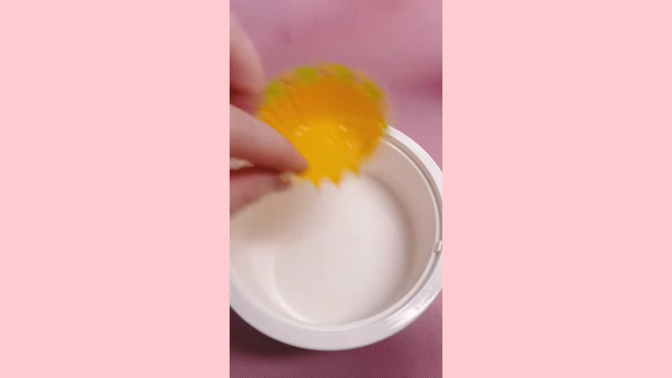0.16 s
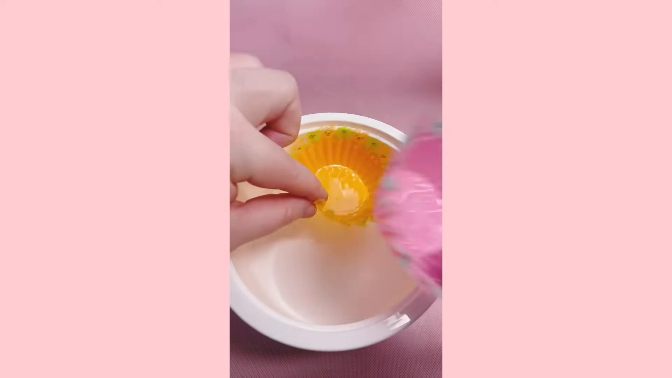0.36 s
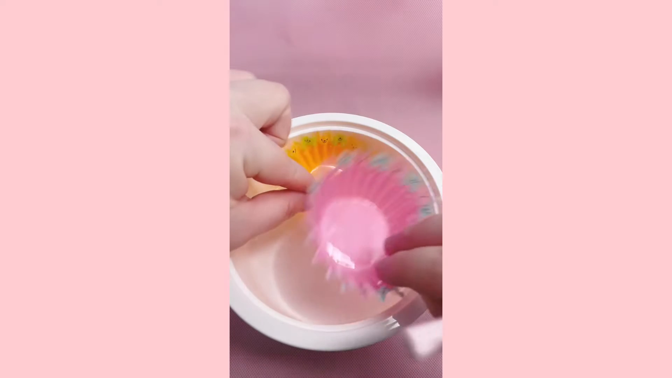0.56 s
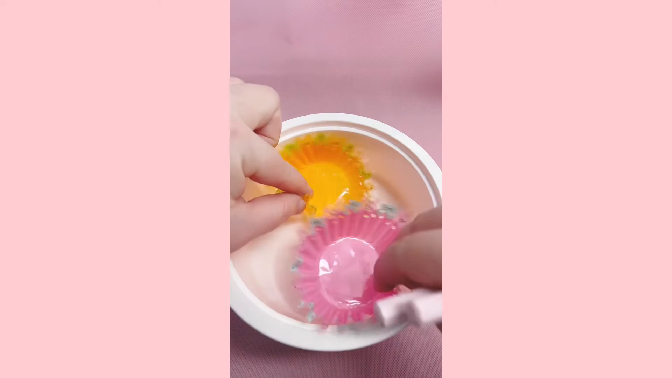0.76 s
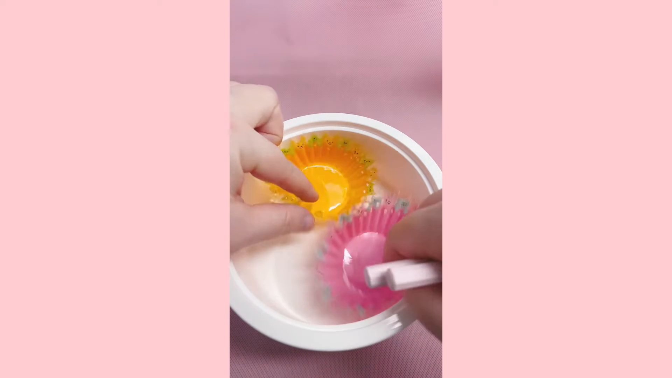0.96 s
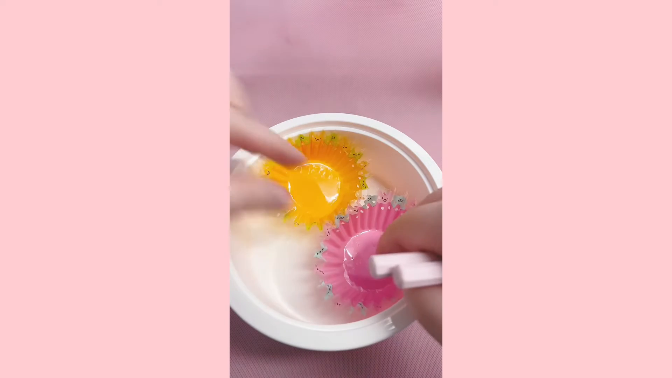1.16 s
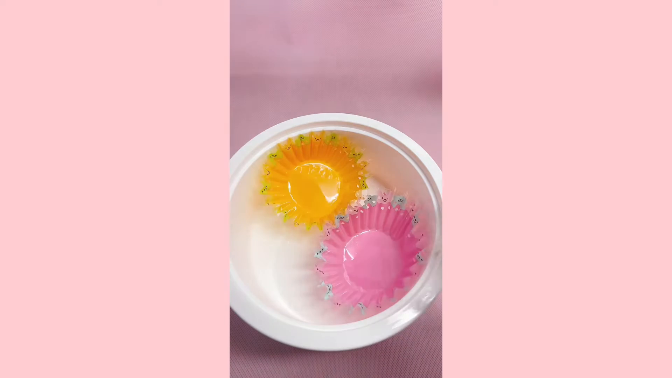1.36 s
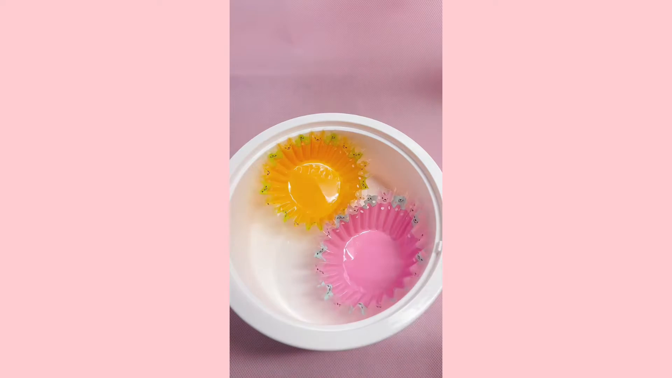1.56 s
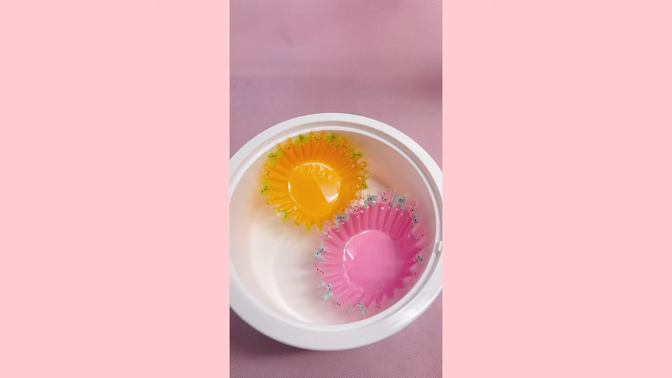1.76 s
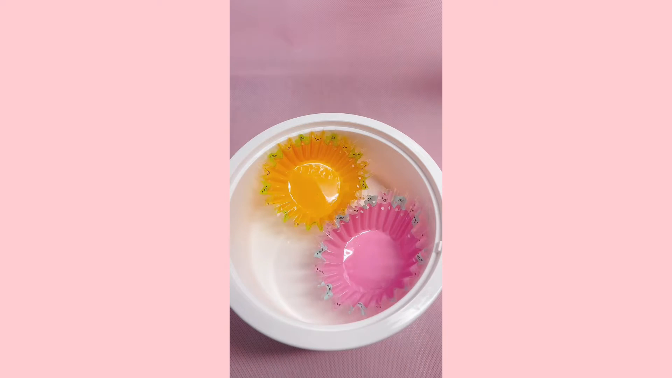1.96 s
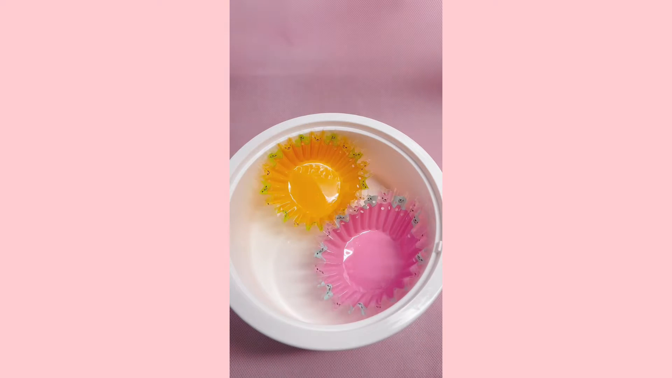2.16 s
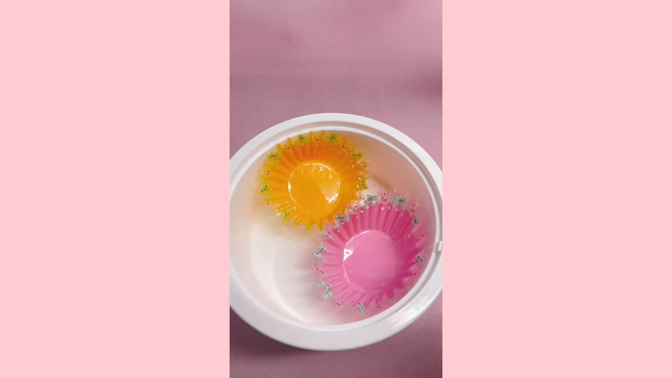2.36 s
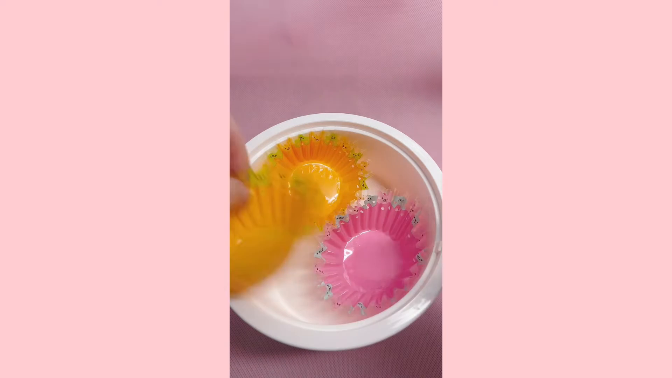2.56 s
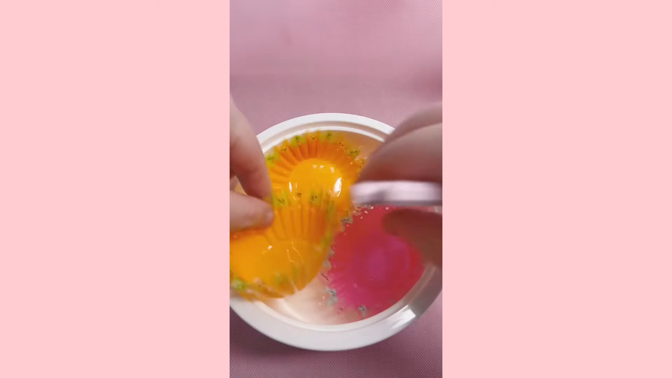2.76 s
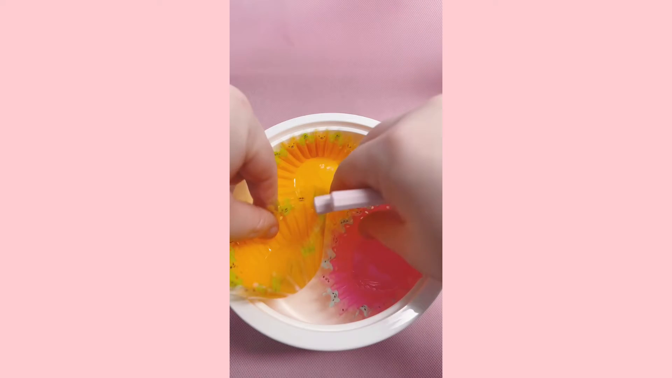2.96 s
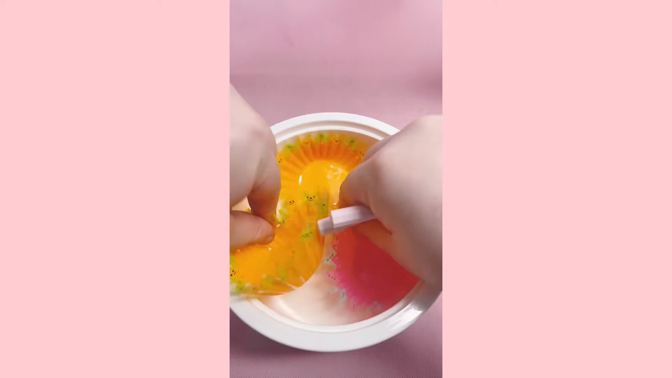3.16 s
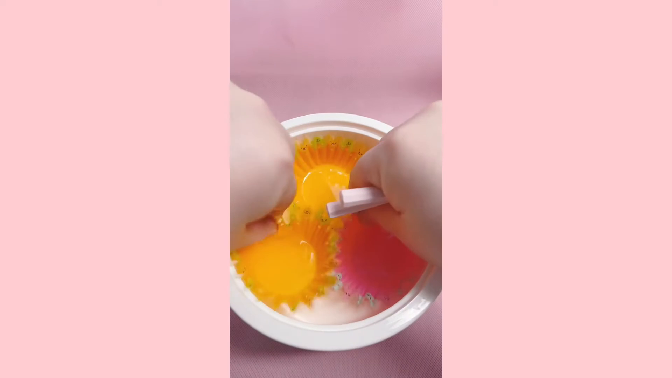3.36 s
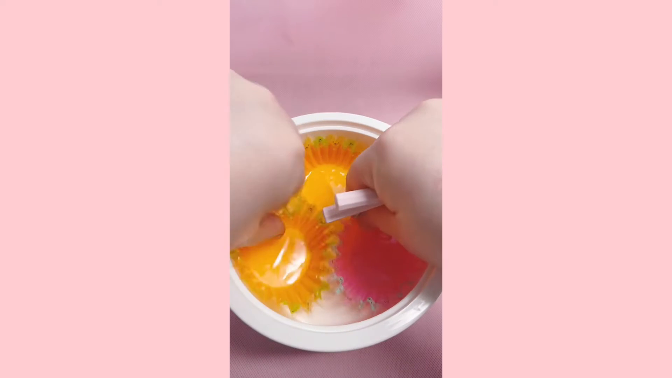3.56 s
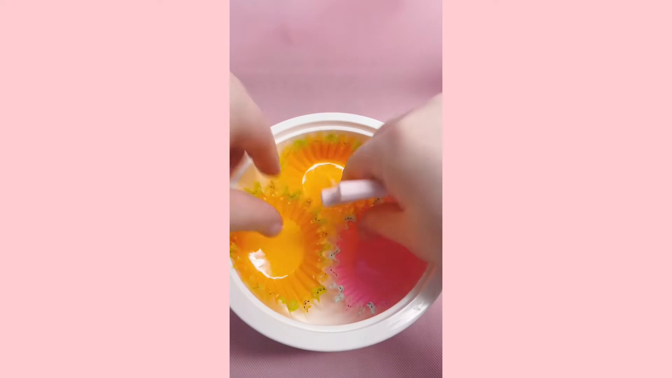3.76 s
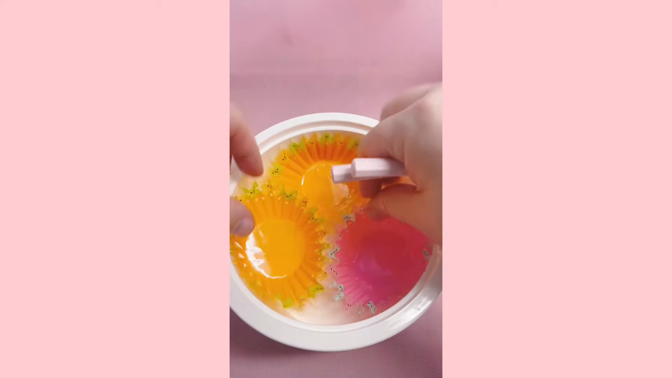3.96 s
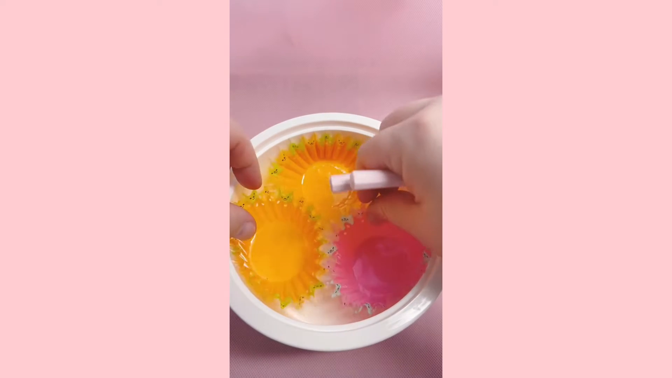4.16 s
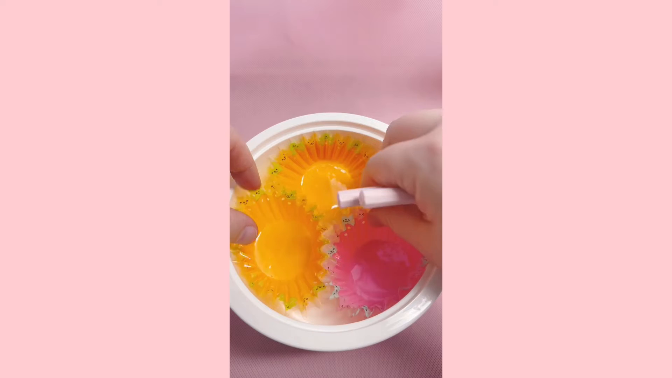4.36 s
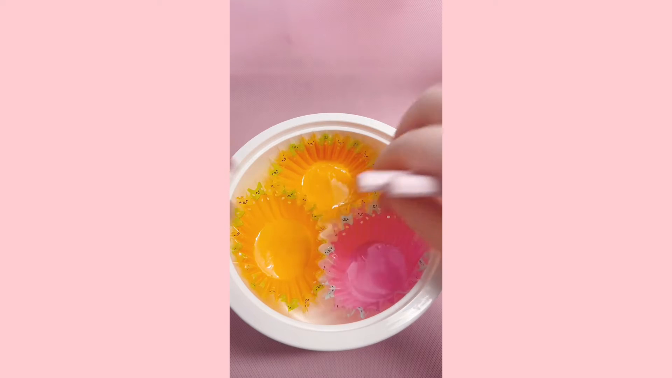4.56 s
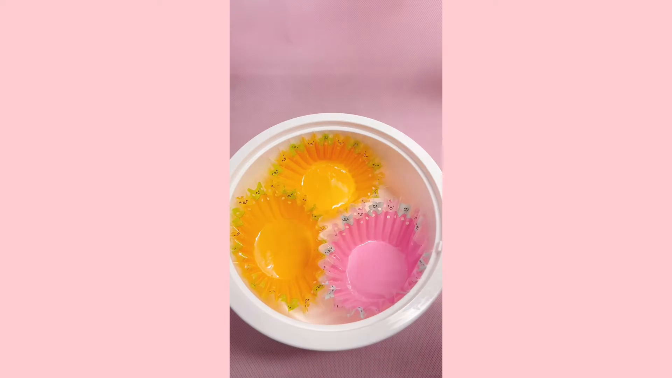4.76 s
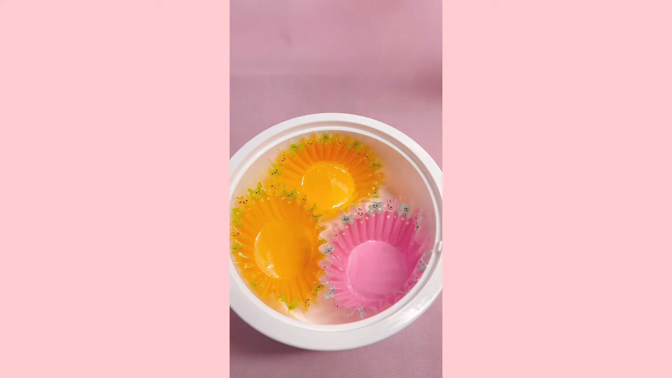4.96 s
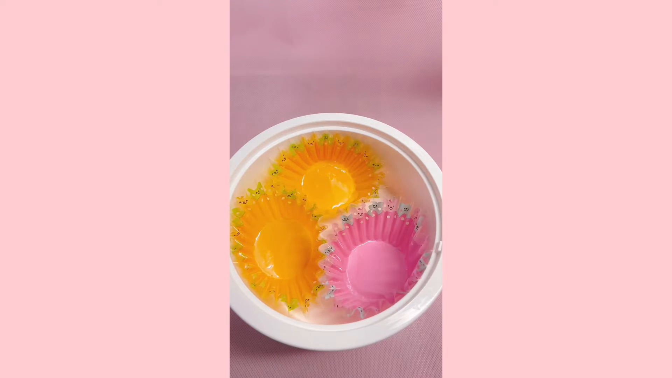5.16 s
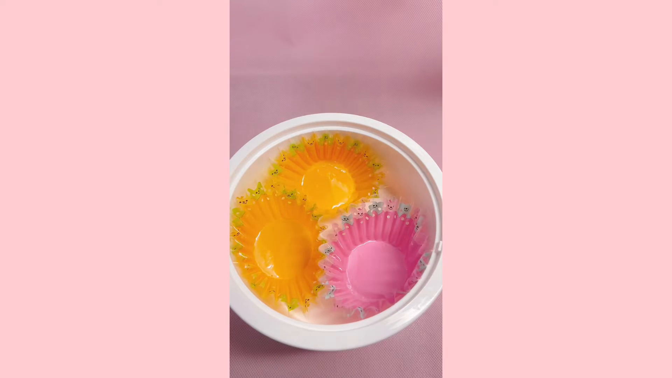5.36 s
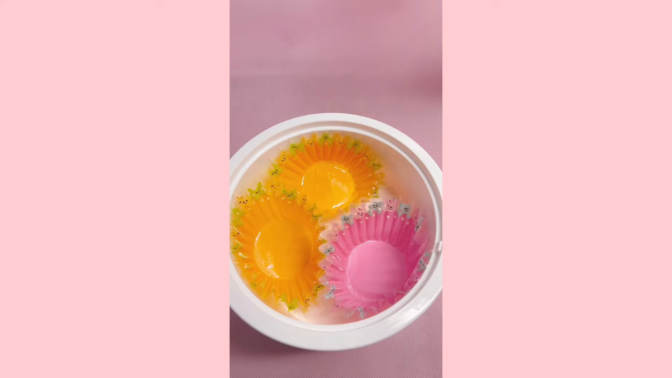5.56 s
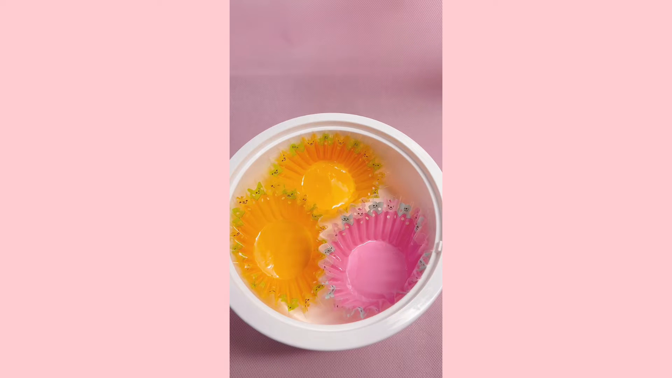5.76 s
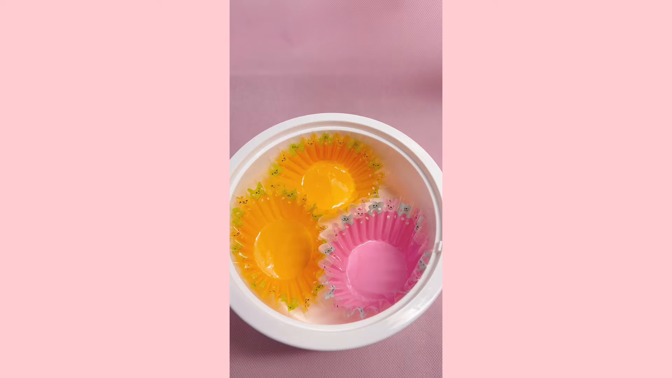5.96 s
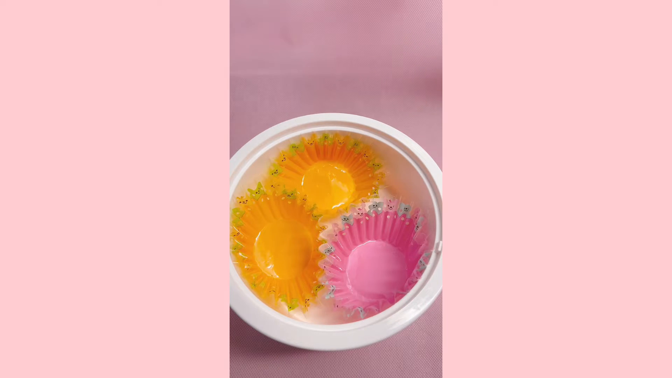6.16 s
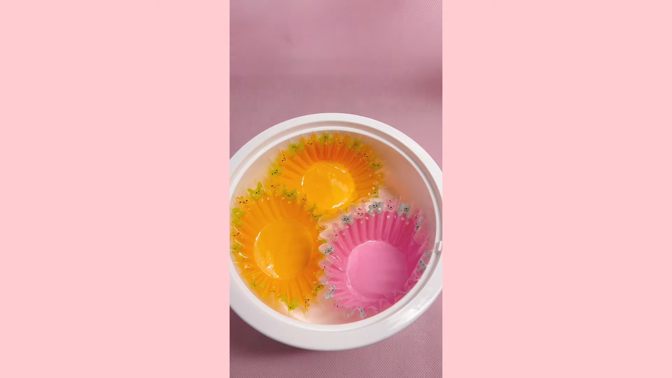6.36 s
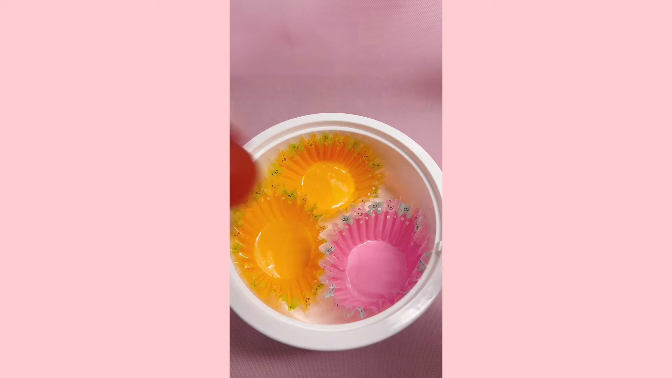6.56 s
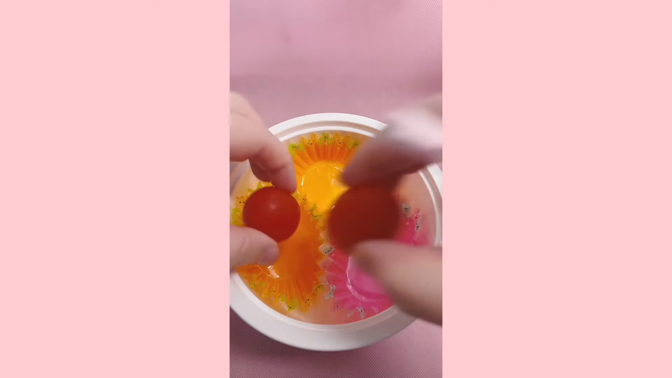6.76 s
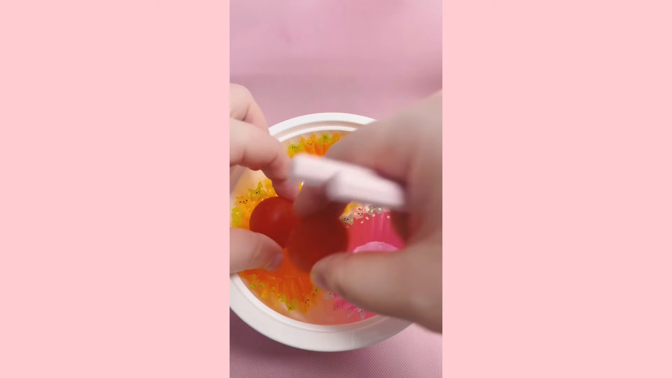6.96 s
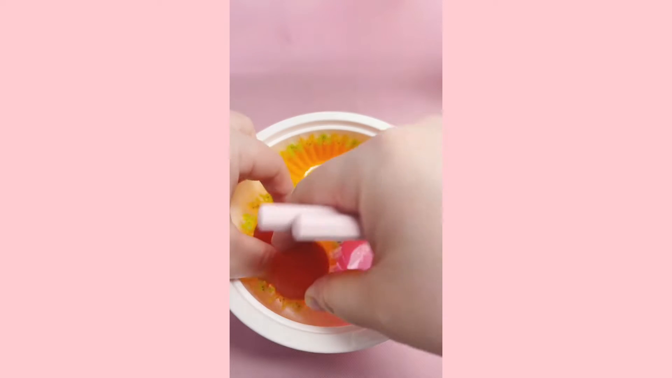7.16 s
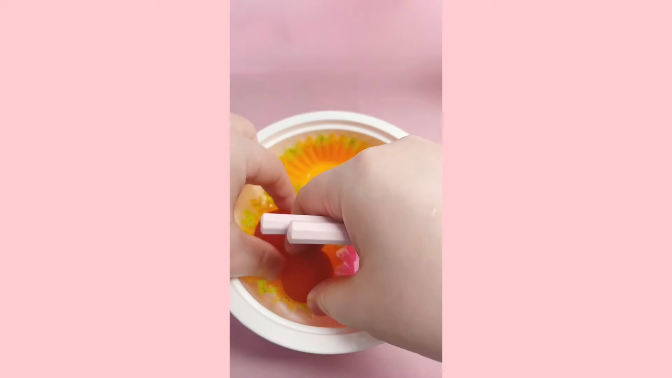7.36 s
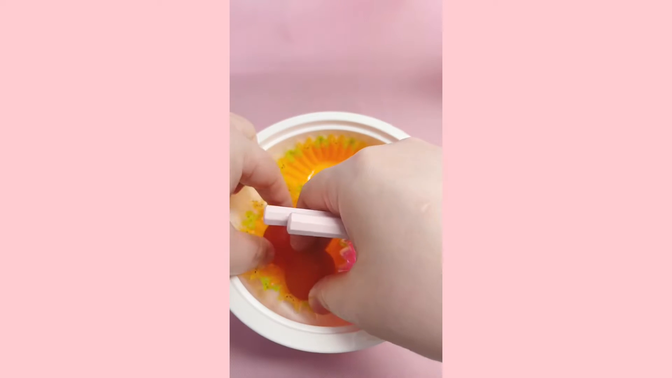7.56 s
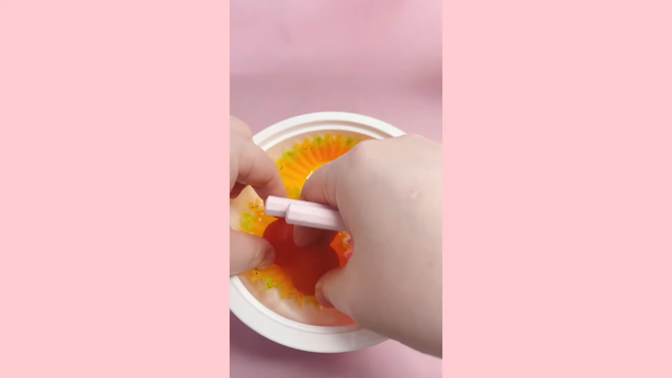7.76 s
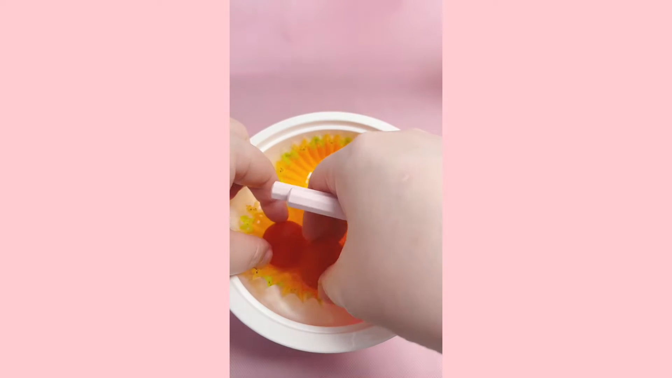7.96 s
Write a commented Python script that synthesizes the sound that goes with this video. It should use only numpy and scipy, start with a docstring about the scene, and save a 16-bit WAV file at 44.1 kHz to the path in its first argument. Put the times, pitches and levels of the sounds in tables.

```python
"""Paper cups, bowl and chopsticks

Pleated paper cups are pressed into a plastic bowl on a table, close to a phone. Snaps and clicks are
noise bursts exciting paper spectra and damped modes; the cups' hollows colour the snaps, and rustle is
filtered noise. Decaying modes make the knocks of bowl and table as a small fruit drops in.
A quiet room with an appliance hum answers briefly through decaying noise tails."""
import sys
import numpy as np
from scipy import signal
from scipy.fft import rfft, irfft, next_fast_len
from scipy.io import wavfile
from scipy.ndimage import map_coordinates

SR = 44100
rng = np.random.default_rng(int(sys.argv[2]) if len(sys.argv) > 2 else 0)


def file_out(sig):
    """Save sig as 16-bit WAV at sys.argv[1]."""
    # one column per channel
    cols = np.atleast_2d(sig).T
    # limit, then scale
    lim = np.clip(cols, -1, 1)
    pcm = np.round(lim * 32767).astype(np.int16)
    wavfile.write(sys.argv[1], SR, pcm)


N = 352359  # samples


def amp(db):
    """Logarithmic level: decibels to an amplitude ratio."""
    return 10 ** (np.asarray(db) / 20)


def unit(x):
    """Power normalization: scale a signal to rms 1."""
    return x / np.sqrt(np.mean(x ** 2) + 1e-20)


def along(points, hz):
    """Logarithmic frequency scale: interpolate (frequency [Hz], value) points."""
    f, value = np.transpose(points)
    return np.interp(np.log(hz + 1), np.log(f + 1), value)


def wobble(rate):
    """Band-limited fluctuation: a smooth random curve with rate knots a second."""
    coarse = np.arange(0, N + 64, 64)
    knots = rng.standard_normal(int(N * rate / SR) + 4)
    curve = map_coordinates(knots, [coarse * rate / SR])
    return np.interp(np.arange(N), coarse, curve)


def impulse(spectrum):
    """Minimum phase: the folded cepstrum of a spectrum gives a causal impulse of energy 1."""
    magnitude = amp(along(spectrum, np.fft.rfftfreq(4096, 1 / SR)))
    cepstrum = irfft(np.log(np.maximum(magnitude, 1e-5)))
    cepstrum[1:2048] *= 2
    cepstrum[2049:] = 0
    pulse = irfft(np.exp(rfft(cepstrum)))
    return pulse / np.linalg.norm(pulse)


def coloured(x, spectrum):
    """Linear filtering: convolve x with the causal impulse of a spectrum."""
    return signal.fftconvolve(x, impulse(spectrum))[:len(x)]


def ring(modes, scatter_db, detune, attack, life=0.09):
    """Modal superposition: a blow excites damped modes at scattered strengths and pitches."""
    t = np.arange(int(SR * life)) / SR
    hz, db, t60 = np.transpose(modes)[:, :, None]
    strength_luck, pitch_luck = rng.standard_normal((2, len(modes), 1))
    sign = (-1.) ** np.arange(len(modes))[:, None]
    decay = amp(db + scatter_db * strength_luck - 60 * t / t60)
    tones = np.sin(2 * np.pi * hz * (1 + detune * pitch_luck) * t)
    return np.sum(sign * decay * tones, 0) * (1 - np.exp(-t / attack))


def burst(t60, rise):
    """Stick-slip release: a sharp first slip, then a spray of micro-slips that dies out."""
    t = np.arange(1, SR // 16) / SR
    first_slip = 1.8 * amp(-60 * t / 0.0021)
    shape = (1 - np.exp(-t / rise)) * (amp(-60 * t / t60) + first_slip)
    uneven = amp(4.8 * rng.standard_normal(len(t)))
    return shape * rng.standard_normal(len(t)) * uneven


def add(out, s, x, db):
    """Linear superposition: mix x, scaled to a peak level in dB, into out at s seconds."""
    part = out[round(s * SR):][:len(x)]
    part += amp(db) * x[:len(part)] / np.abs(x).max()


# spectrum of the air and self-noise: (frequency [Hz], relative density [dB per Hz])
AIR_SPECTRUM = [(30, -23), (45, -17), (75, -6.5), (200, -12), (240, -16), (270, -17), (410, -11.5),
                (480, -17.5), (1080, -21.5), (2700, -27), (3050, -29), (3480, -26), (6100, -32),
                (10000, -39), (15300, -40)]
# partials of the appliance hum: (frequency [Hz], level [dB rms], waver rate [knots per s])
HUM_PARTIALS = [(29, -70, 14), (60, -60, 4.5), (102.5, -76, 4.3), (237.5, -70, 3.2), (291, -81.5, 13),
                (415, -77.5, 2.12), (483, -80, 7.1), (2760, -85.5, 10), (4290, -87, 70)]
AIR_DB = -65.5  # rms level before its slight waver


def room_tone():
    """Stationary noise and modulated partials: steady air under a slightly wavering hum."""
    t = np.arange(N) / SR
    hum = np.zeros(N)
    for hz, db, rate in HUM_PARTIALS:
        level = np.sqrt(2) * amp(db + 0.97 * wobble(rate))
        hum += level * np.sin(2 * np.pi * hz * t + 0.46 * wobble(rate))
    air = coloured(rng.standard_normal(N), AIR_SPECTRUM)
    return hum + amp(AIR_DB + 0.54 * wobble(2.86)) * air


def crackle(per_s, spread_db, t60, hiss):
    """Shot noise: clumped random micro-creases puff over a sliding hiss; rms 1."""
    hits = rng.random(N) < per_s / SR * amp(5 * wobble(20))
    sizes = hits * amp(spread_db * np.clip(rng.standard_normal(N), -2.5, 2.5))
    puffs = signal.lfilter([1], [1, -amp(-60 / (t60 * SR))], sizes)
    return unit((unit(puffs) + hiss) * rng.standard_normal(N))


# spells of handling the paper, each a list of: (time [s], rustle level in the cups [dB])
RUSTLE_SPELLS = [
    [(0.35, -82), (0.438, -82), (0.584, -58), (0.644, -51), (0.808, -54), (0.884, -37), (1.014, -56),
     (1.146, -67), (1.22, -78.5)],
    [(1.79, -63), (1.846, -68.5), (1.936, -65), (1.966, -58.5), (2.058, -67), (2.15, -77.5)],
    [(2.32, -77), (2.374, -64), (2.49, -55.5), (2.574, -61), (2.684, -48), (2.864, -48), (3.06, -54.5)],
    [(3.06, -46), (3.194, -51.5), (3.268, -43.5), (3.42, -48), (3.656, -52.5), (3.692, -48), (3.822, -54.5),
     (3.93, -77)],
    [(3.95, -69), (4.062, -60.5), (4.194, -54.5), (4.326, -66), (4.38, -57.5), (4.504, -59.5), (4.58, -83)],
    [(6.915, -65.5), (6.991, -57), (7.123, -57), (7.315, -56.5), (7.443, -56.5), (7.707, -58),
     (7.803, -59.5), (7.99, -60.5)],
]
# strokes of paper on paper: (time [s], length [s], open-sheet level [dB], hollow level [dB])
SLIDE_STROKES = [(0.001, 0.069, -63, -61), (0.273, 0.059, -65.5, -67), (0.403, 0.053, -61, -52),
                 (.95, 0.08, -53, -52.5), (1.035, 0.097, -72, -66), (2.777, 0.1, -50, -49),
                 (2.944, 0.082, -52, -63), (3.153, 0.08, -51, -50), (3.254, .1, -54.5, -57),
                 (3.981, 0.092, -55, -53), (4.105, 0.041, -58, -68), (4.342, 0.045, -55, -56),
                 (4.486, 0.059, -74, -71), (5.171, .3, -66, -74), (6.156, .17, -70, -92.5),
                 (6.913, 0.21, -71.5, -77.5), (7.082, 0.091, -53.5, -51), (7.248, 0.058, -60, -55),
                 (7.348, 0.024, -57, -63)]
# rustle inside the cups: (frequency [Hz], relative density [dB per Hz])
CUPPED_SPECTRUM = [(400, -56), (680, -13.5), (870, -1), (1200, -4), (1450, -1.5), (1700, 3), (1900, -1.5),
                   (2180, -6.5), (2550, -2.5), (3000, -25.5), (4200, -28.5), (6000, -37)]
# open sheet sliding: (frequency [Hz], relative density [dB per Hz])
SLIDE_SPECTRUM = [(1760, -26.5), (3000, 2.5), (4500, -1.5), (7400, -5.5), (10500, -14.5), (13000, -16),
                  (15300, -8), (17000, -25.5)]
# bowl wall under rubbing: (frequency [Hz], relative density [dB per Hz])
RUBBED_SPECTRUM = [(100, -34.5), (180, -23.5), (270, 3.5), (355, 3.5), (420, 0), (600, -11), (900, -40)]
SHEET_DB = -7  # open sheet relative to the rustle in the cups
RUB_DB, RUB_GROWS = -57.5, 0.82  # bowl wall at a rustle of -49 dB; its growth, dB per dB
GRIP_S, LET_GO_S = 0.024, 0.016  # a stroke's attack and release


def rustle():
    """Friction noise: creasing paper heard through the cups, in the open sheet and the bowl wall."""
    t = np.arange(N) / SR
    flutter_db = 3.4 * wobble(30)
    creases = crackle(per_s=320, spread_db=5, t60=0.007, hiss=.6)
    in_cups = coloured(creases, CUPPED_SPECTRUM)
    in_sheet = coloured(creases, SLIDE_SPECTRUM)
    in_bowl = coloured(rng.standard_normal(N), RUBBED_SPECTRUM)
    gains = np.zeros((3, N))
    for spell in RUSTLE_SPELLS:
        s, db = np.transpose(spell)
        now = slice(round(s[0] * SR), round(s[-1] * SR))
        fade_in = np.clip((t[now] - s[0]) / .008, 0, 1)
        level_db = np.interp(t[now], s, db)
        rub_db = RUB_DB + RUB_GROWS * (level_db + 49)
        gains[:, now] = fade_in * amp([level_db, level_db + SHEET_DB, rub_db])
    for s, length, sheet_db, hollow_db in SLIDE_STROKES:
        stroke = np.clip(np.minimum((t - s) / GRIP_S, (s + length - t) / LET_GO_S), 0, 1)
        gains[:2] += amp([[hollow_db], [sheet_db]]) * stroke
    # the balance of hollow, sheet and bowl wall shifts as the folds move
    shifts_db = np.array([2.5 * wobble(22), .8 * wobble(22), 1.7 * wobble(15)])
    layers = np.array([in_cups, in_sheet, in_bowl])
    return np.sum(amp(flutter_db + shifts_db) * gains * layers, 0)


# soft drops and pushes: (time [s], bowl peak level [dB], table level relative to the bowl [dB])
SOFT_DROPS = [(0.568, -37, -33), (.66, -49, -12), (0.887, -33, -20), (0.975, -62, -24), (1.026, -45, -19),
              (2.488, -38.5, -19), (2.636, -32.5, -19), (2.69, -42.5, -10), (2.79, -39, -17),
              (2.855, -41.5, -16), (2.953, -43, -11), (3.19, -36, -14.5), (3.27, -41, -15),
              (3.33, -49.5, -1), (3.709, -34.5, -17), (4.009, -42, -10), (5.891, -65, 14.5),
              (5.957, -54, -4), (7.437, -38.5, -23.5), (7.481, -16.5, -20), (7.504, -30, -4.5),
              (7.559, -45, 3), (7.659, -48, -2)]
# modes of the plastic bowl: (frequency [Hz], relative level [dB], t60 [s])
BOWL_MODES = [(236, 0, .035), (290, 3, .03), (350, 3, .045), (430, -12, .05), (790, -16, .035),
              (915, -13, .04), (1300, -20, .025)]
# modes of the table: (frequency [Hz], relative level [dB], t60 [s])
TABLE_MODES = [(71.4, -29, 0.068), (88, 16.5, 0.044), (127, 0.5, 0.24)]


def drops():
    """Impact and transmission: soft weights thump the bowl and, 9 ms later, the table under it."""
    out = np.zeros(N)
    for s, db, table_db in SOFT_DROPS:
        bowl = ring(BOWL_MODES, scatter_db=1, detune=.01, attack=.004)
        table = ring(TABLE_MODES, scatter_db=0.6, detune=0.054, attack=0.011, life=.25)
        add(out, s, bowl, db)
        add(out, s + 0.009, table, db + table_db)
    return out


# chopstick clicks: (time [s], reference level [dB], low-mode peak relative to it [dB])
STICK_CLICKS = [(4.798, -44.5, -3), (4.8108, -46.5, -2.5), (4.8455, -60, 8), (5.044, -47, -1),
                (5.127, -57, 6), (5.2147, -52, -4), (5.049, -28, -5), (5.0706, -51, 3.5), (5.1, -44, -2),
                (5.1766, -51, -4), (5.242, -49, -4), (5.2599, -25, -21.5), (5.2763, -34, -17),
                (5.2886, -47, -22), (5.3962, -37, -11), (5.422, -41.5, -24), (5.9455, -55, -19)]
# bending modes of the sticks: (frequency [Hz], relative level [dB], t60 [s])
STICK_MODES = [(2210, -11, 0.089), (2530, 3, 0.011), (3160, 3.5, 0.013), (4300, 4.5, 0.0051),
               (5540, 6, 0.0071), (6840, 7.5, 0.0073), (8380, 2.5, 0.011), (10060, 6, 0.0088),
               (11550, -5, 0.0078), (13000, -1.5, 0.018), (14500, -1, 0.011)]
# body of the paper sheet, also the colour of the tick: (frequency [Hz], relative density [dB per Hz])
SHEET_SPECTRUM = [(1180, -55), (2000, 2), (2120, -8), (2720, -0.5), (2960, -9.5), (3750, -0.5), (4190, -4),
                  (5080, -6.5), (6550, -6.5), (8500, -18), (11000, -36.5), (18700, -120)]
# top modes relative to a click of -30.5 dB; harder clicks are brighter, dB per dB
TOP_DB, TOP_GROWS = -11.5, 0.94


def chopsticks():
    """Bending vibration: hard contact gives a tick and a ladder of damped modes."""
    out = np.zeros(N)
    for s, db, low_db in STICK_CLICKS:
        slips = burst(t60=0.032, rise=0.00024)
        add(out, s, coloured(slips, SHEET_SPECTRUM), db - 15.5)
        top_db = TOP_DB + TOP_GROWS * (db + 30.5)
        groups = [(STICK_MODES[:3], low_db), (STICK_MODES[3:7], -1.5), (STICK_MODES[7:], top_db)]
        for modes, level_db in groups:
            bending = ring(modes, scatter_db=2.5, detune=.01, attack=.0002, life=.06)
            add(out, s, signal.fftconvolve(slips, bending), db + level_db)
    return out


# pleat snaps: (time [s], sheet peak level [dB], hollow relative to it [dB], hollow pitch [Hz],
# crisp treble relative to it [dB], burst t60 [s])
PLEAT_SNAPS = [(0.3552, -30.5, 1, 1190, -19, 0.019), (0.391, -42, 1, 1340, -31, 0.017),
               (0.417, -43.5, -5, 1480, -24, 0.036), (0.467, -39.5, -13, 1880, -3, 0.029),
               (0.5664, -29.5, -2.5, 1770, -33, 0.034), (0.6146, -42, 9, 1720, -13, 0.023),
               (0.6587, -29.5, -3.5, 1660, -23, 0.029), (0.6859, -34.5, -8, 1910, -7, 0.018),
               (0.7098, -39.5, 4.5, 1220, -14, 0.029), (0.8341, -23, -12, 1550, 3, 0.036),
               (0.8364, -14.5, -10.5, 1800, -5.5, 0.02), (0.8553, -31, -5, 1750, -18, 0.017),
               (0.8712, -18.5, 2.5, 1810, -21.5, 0.033), (0.8804, -23, 6, 1690, -22, 0.017),
               (0.8919, -28, -1, 1740, -22, 0.017), (0.9277, -42, 7, 1780, -14, 0.02),
               (0.938, -44, -11, 1480, 2, 0.02), (0.9777, -29, -5, 1740, -1, 0.022),
               (1.0243, -40, 4.5, 1520, -11, 0.03), (1.1089, -46, -7, 1500, -14, 0.023),
               (1.145, -45.5, -8, 1540, -19, 0.016), (1.1704, -47.5, -13, 1580, -21, 0.027),
               (1.1935, -57.5, -14.5, 1620, -20.5, 0.023), (1.7943, -42, -9, 1530, -23, 0.022),
               (1.816, -39, 2, 1770, -9, 0.015), (1.8214, -33.5, 3, 1600, -5, 0.02),
               (1.859, -40.5, 7.5, 1380, -27, 0.028), (1.8948, -15, -4.5, 1370, -3.5, 0.016),
               (2.0752, -59, 8.5, 1370, -24, 0.015), (2.2424, -55, -19, 953, -10, 0.013),
               (2.3084, -15, -9, 1740, -2.5, 0.017), (2.484, -40, 1, 1750, 0, 0.022),
               (2.4906, -27.5, 1.5, 1310, -12, 0.016), (2.5207, -41.5, 11, 1100, -26, 0.036),
               (2.5364, -40.5, 11.5, 1450, -29, 0.047), (2.5813, -46.5, 14.5, 1460, -21, 0.014),
               (2.623, -44.5, -8, 1270, -21, 0.018), (2.6367, -26.5, 3.5, 1320, -22, 0.027),
               (2.6558, -33.5, 2, 1580, -25, 0.025), (2.6877, -44, -2, 1590, -23, 0.022),
               (2.748, -42, 12.5, 1820, -19, 0.02), (2.7684, -39, 2, 1640, -23, 0.02),
               (2.7903, -31.5, 3, 1540, -18, 0.025), (2.831, -24.5, -4, 1620, -19, 0.0093),
               (2.8587, -36, -9, 1710, -24, 0.02), (2.9554, -41.5, 9, 1750, -4, 0.036),
               (2.9771, -28.5, -1, 1710, -1, 0.016), (3.0015, -28.5, -22, 2150, -3, 0.03),
               (3.0693, -15, -6.5, 1620, -3.5, 0.029), (3.1565, -25, -8.5, 1740, -20, 0.019),
               (3.1628, -32, 4, 1760, -1, 0.039), (3.1808, -29, -8, 1650, -8, 0.018),
               (3.2464, -19.5, -5, 1630, -4.5, 0.019), (3.269, -27, -16, 1630, 1, 0.0082),
               (3.309, -30.5, -2, 1470, -4, 0.018), (3.3235, -36, 7.5, 1660, -22, 0.014),
               (3.3707, -29, 0, 1560, -13, 0.024), (3.3788, -33, 3, 1580, -8, 0.019),
               (3.452, -39.5, 0, 1740, 0, 0.022), (3.4618, -42, 6, 1020, -15, 0.02),
               (3.5453, -37.5, 2.5, 1670, -25, 0.02), (3.5553, -31, -9, 1590, -25, 0.014),
               (3.5968, -42, -6.5, 1660, -12, 0.02), (3.6092, -44, 8, 1870, -18, 0.024),
               (3.6711, -24.5, -5.5, 1220, -2, 0.0097), (3.709, -15.5, -1.5, 1580, 0, 0.012),
               (3.7845, -39, 8, 1670, -6, 0.028), (3.799, -30, -2, 1780, -8.5, 0.041),
               (4.0086, -44, 5, 1630, 1, 0.028), (4.023, -28.5, 3.5, 1710, -12, 0.038),
               (4.0467, -31, -14, 1510, -21, 0.02), (4.0867, -36.5, 2, 1560, -3, 0.02),
               (4.117, -46.5, 10.5, 1470, -6, 0.023), (4.1904, -39.5, -12, 1540, 7.5, 0.031),
               (4.2047, -35, 3, 1650, -9, 0.035), (4.2102, -34.5, 6.5, 1540, -1, 0.05),
               (4.361, -37, -1, 1680, -3, 0.013), (4.4384, -38, 1, 1750, 1, 0.028),
               (4.4488, -32, -2, 1620, -16, 0.014), (4.5014, -51.5, 6.5, 1190, -11, 0.022),
               (6.919, -54, -14.5, 1730, -10.5, 0.02), (6.9613, -49, -4, 1830, -8, 0.053),
               (7.001, -44.5, -3, 1590, -20, 0.035), (7.1053, -42, -18, 1760, -6, 0.038),
               (7.1439, -34, 1.5, 1680, -5, 0.041), (7.1863, -44.5, 0, 1630, -27, 0.042),
               (7.2544, -47, -4, 1790, -8, 0.023), (7.2724, -35.5, -12, 1640, -2, 0.023),
               (7.2898, -38.5, 0, 1730, -15, 0.022), (7.338, -45, -5, 1630, -2, 0.031),
               (7.364, -49, -2, 1670, -11, 0.02), (7.415, -38.5, 10.5, 1720, -22, 0.017),
               (7.436, -37.5, 8.5, 1230, -15, 0.012), (7.518, -18.5, 2.5, 1750, -5, 0.012),
               (7.6054, -49, 9.5, 1650, -18, 0.032), (7.6952, -38.5, 3, 1640, -7, 0.02),
               (7.7388, -45, -1, 1750, -19, 0.027), (7.859, -41, -9, 1620, -12, 0.029),
               (7.892, -23.5, -17, 1490, -5.5, 0.0095)]
# air and wall modes of the cups: (frequency [Hz], relative level [dB], t60 [s])
HOLLOW_MODES = [(1015, -31.5, 0.0627), (1225, -4.5, 0.022), (1290, 6, 0.0093), (1549, -6, 0.024),
                (1700, 5, 0.015), (1680, -27.5, 0.035), (2720, -27.5, 0.0177), (2570, -7, 0.02)]
# crisp edge of the paper: (frequency [Hz], relative density [dB per Hz])
CRISP_SPECTRUM = [(5000, -20.5), (8500, -8.5), (11500, -3.5), (13000, -7), (14500, 7), (15500, -6),
                  (17000, -3)]
RISE_S = 0.0012  # time constant of the slip's rise
FOLD_HZ, FOLD_SPREAD = 2977, 0.15  # median fold pitch; its spread in octaves
PANEL_DB, NUDGE_DB = -4.5, -28  # panel and bowl relative to the sheet's peak


def snaps():
    """Buckling: each snap cracks across the sheet, rings the cup's hollow and nudges the bowl."""
    out = np.zeros(N)
    body, edge = impulse(SHEET_SPECTRUM)[:512], impulse(CRISP_SPECTRUM)[:512]
    for s, db, hollow_db, pitch_hz, crisp_db, t60 in PLEAT_SNAPS:
        slips = burst(t60, RISE_S)
        # modes near the pitch of the squeezed hollow are favoured
        favoured = [(hz, level - 18 * abs(np.log2(hz / pitch_hz)), decay)
                    for hz, level, decay in HOLLOW_MODES]
        hollow = ring(favoured, scatter_db=2.96, detune=0.041, attack=0.0008, life=.04)
        # the panel of paper beside the fold rings briefly at its own pitch
        fold_hz = FOLD_HZ * 2 ** (FOLD_SPREAD * rng.standard_normal())
        panel_modes = [(fold_hz, 0, .004), (2.6 * fold_hz, -5, .002)]
        panel = ring(panel_modes, scatter_db=1.5, detune=.01, attack=.0002, life=.01)
        # the highest treble comes mostly from the first slips
        first_slips = slips * amp(-250 * np.arange(len(slips)) / SR)
        bowl = ring(BOWL_MODES, scatter_db=8.4, detune=0.0662, attack=0.011)
        add(out, s, signal.fftconvolve(slips, body), db)
        add(out, s, signal.fftconvolve(slips, panel), db + PANEL_DB)
        add(out, s, signal.fftconvolve(first_slips, edge), db + crisp_db)
        add(out, s, signal.fftconvolve(slips, hollow), db + hollow_db)
        add(out, s, bowl, db + NUDGE_DB)
    return out


# reverberation of the room: (frequency [Hz], t60 [s])
ROOM_DECAY = [(200, 0.2), (1400, 0.21), (4000, 0.21), (10000, 0.17)]


def room(x):
    """Diffuse reverberation: each frequency dies at its own speed; every quarter second gets a fresh tail."""
    out, hop = np.zeros(N + SR), SR // 4
    for start in range(0, N, hop):
        hz, t, noise = signal.stft(rng.standard_normal(SR // 3), SR, nperseg=256)
        decay = amp(-60 * t / along(ROOM_DECAY, hz)[:, None])
        tail = signal.istft(noise * decay, SR, nperseg=256)[1]
        wet = signal.fftconvolve(x[start:start + hop], tail / np.linalg.norm(tail))
        out[start + 130:][:len(wet)] += wet  # 130 samples: 3 ms before the first reflections
    return out[:N]


def scene():
    """Superposition of direct and reverberant fields: close sources, their echo and the room tone."""
    near = snaps() + chopsticks() + drops() + rustle()
    return (near + amp(-8.5) * room(near) + room_tone())[None]


# treble roll-off of the phone: (frequency [Hz], gain [dB])
MIC_ROLL_OFF = [(15750, 0), (16100, -13.5), (17000, -29.5)]
TOP_HZ = 17097  # band limit


def record(dry):
    """Band limitation: the phone rolls off its top treble and keeps nothing above its limit."""
    m = next_fast_len(N + SR // 4)
    hz = np.fft.rfftfreq(m, 1 / SR)
    response = amp(along(MIC_ROLL_OFF, hz)) * (hz < TOP_HZ)
    return irfft(rfft(dry, m) * response, m)[:, :N]


dry = scene()
out = record(dry)
file_out(out)
```